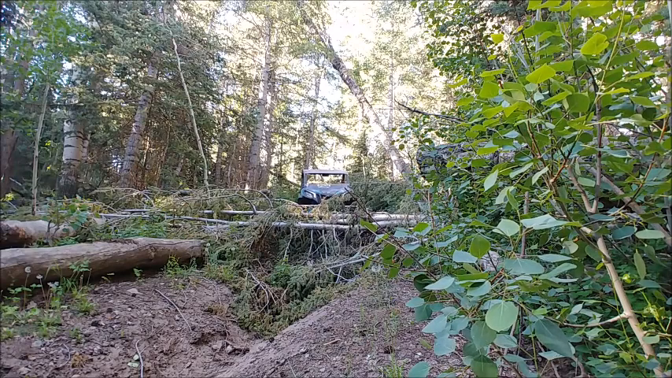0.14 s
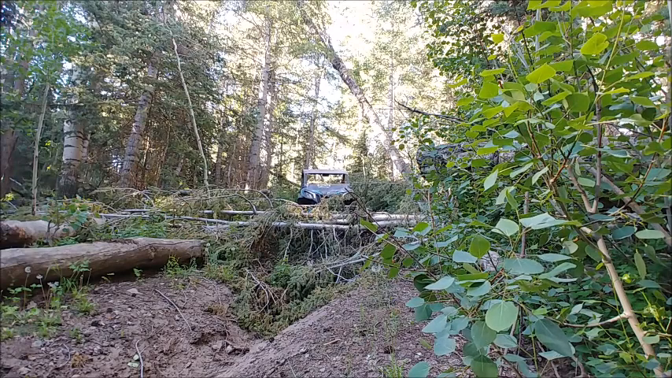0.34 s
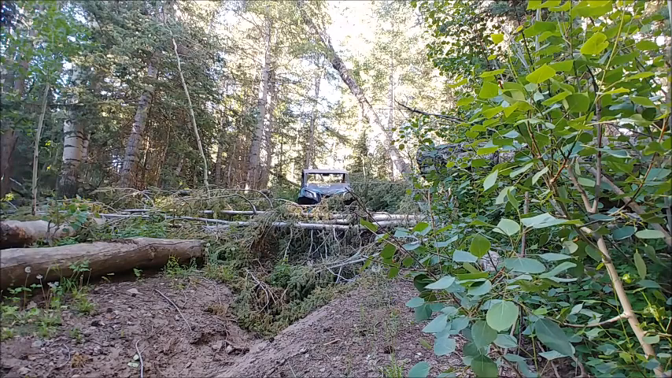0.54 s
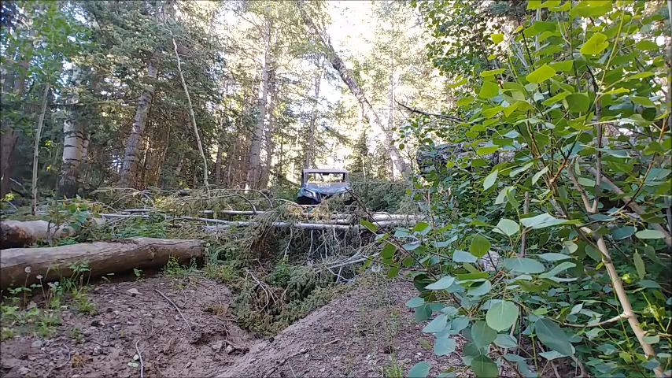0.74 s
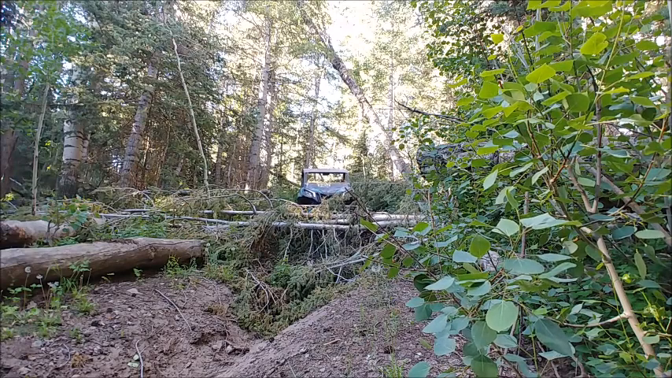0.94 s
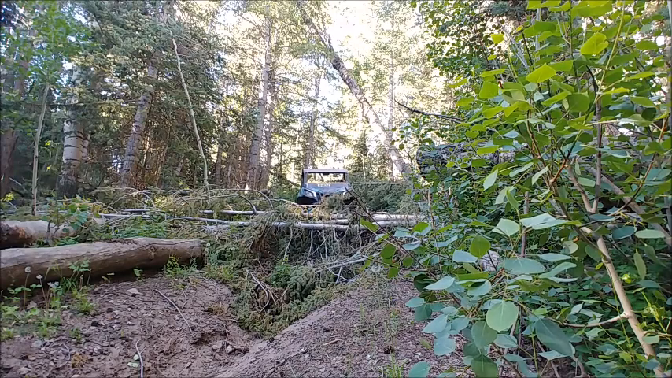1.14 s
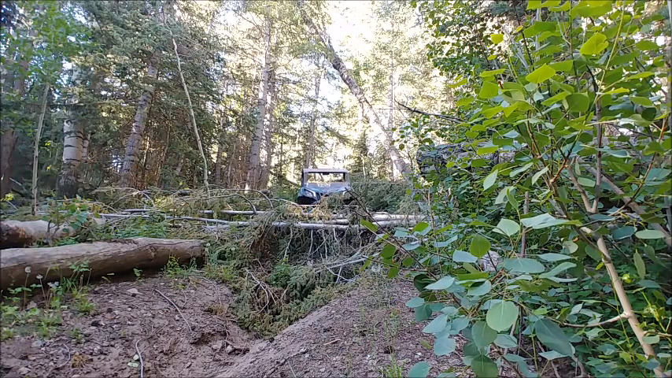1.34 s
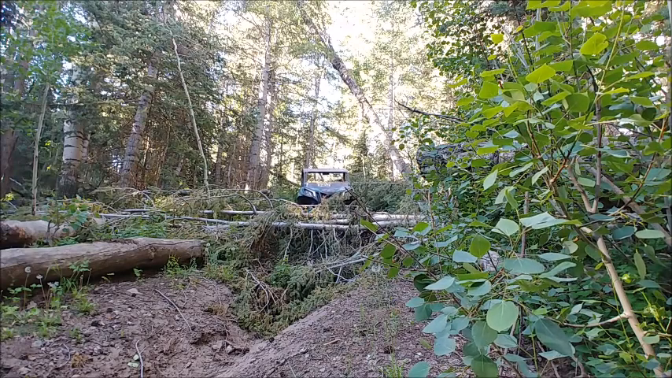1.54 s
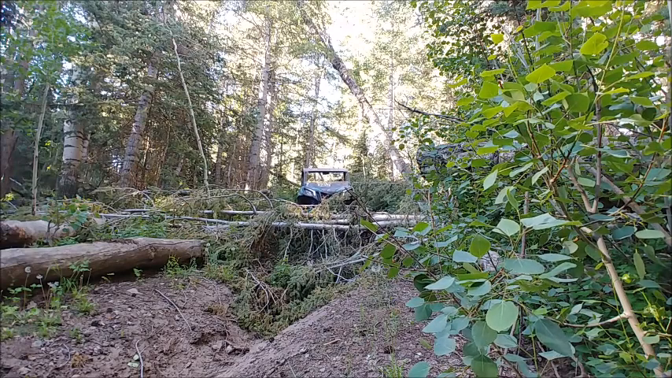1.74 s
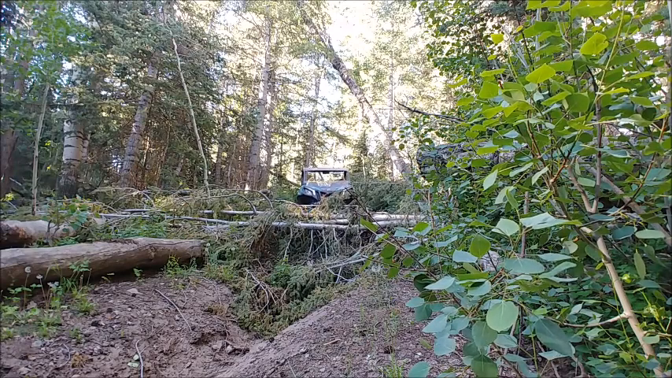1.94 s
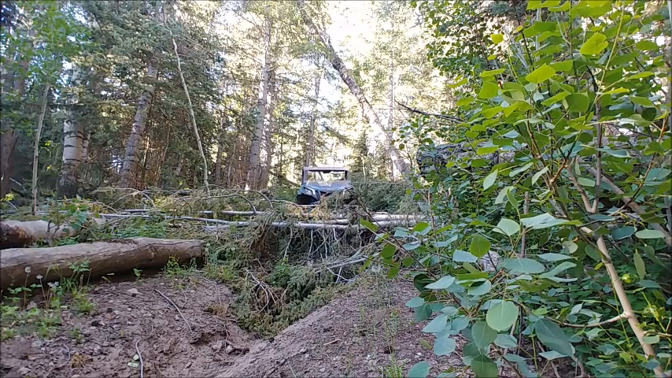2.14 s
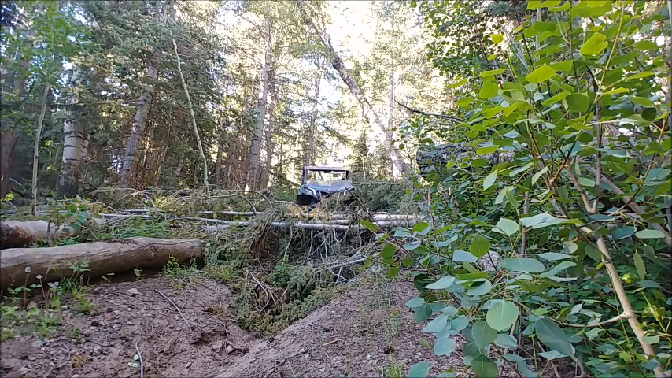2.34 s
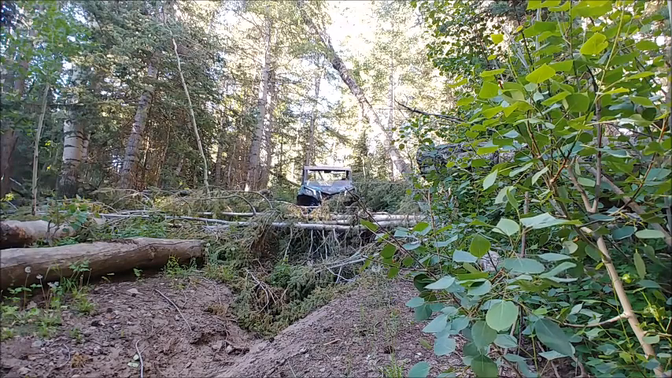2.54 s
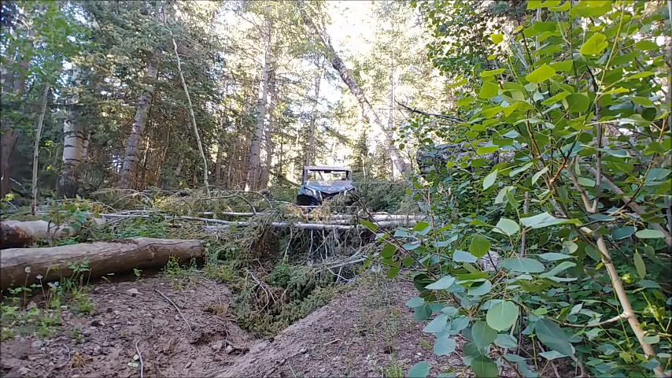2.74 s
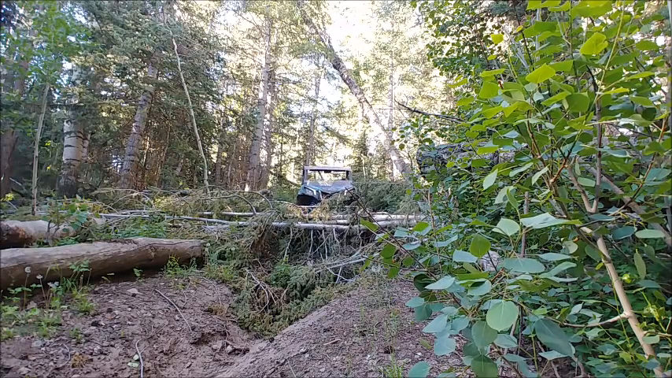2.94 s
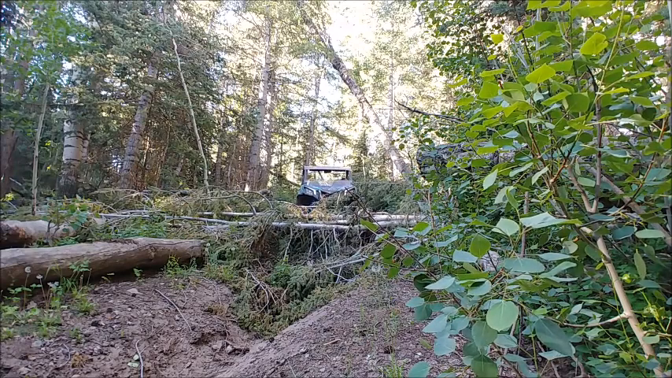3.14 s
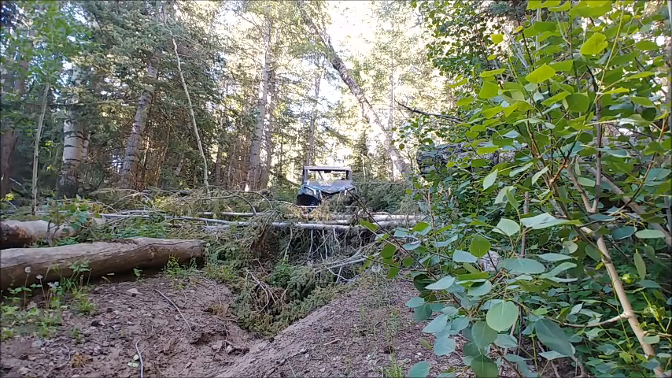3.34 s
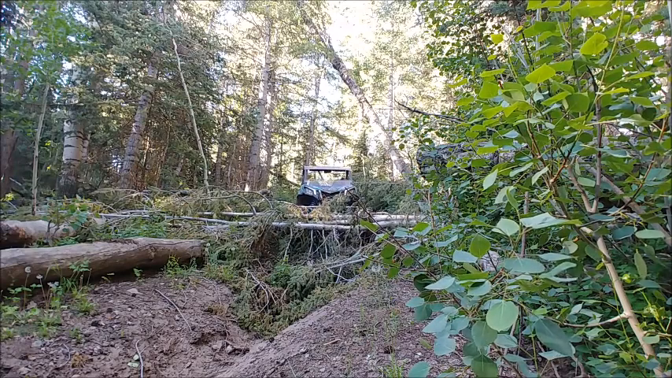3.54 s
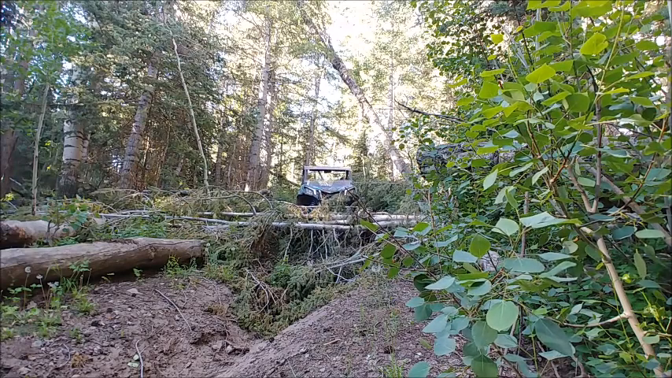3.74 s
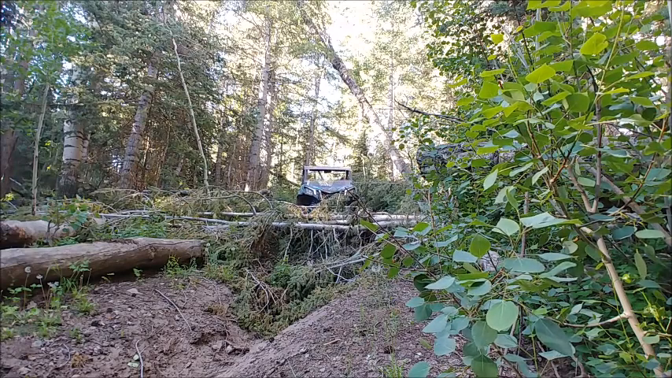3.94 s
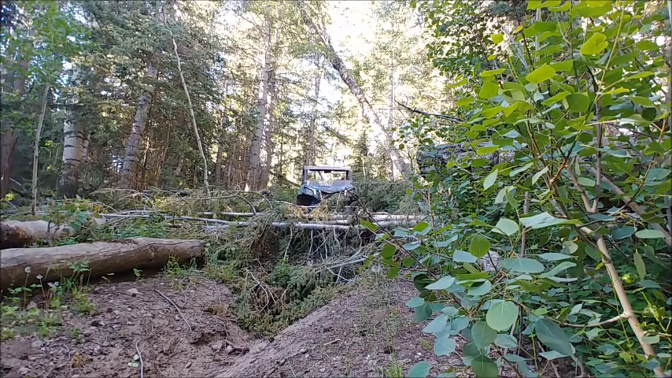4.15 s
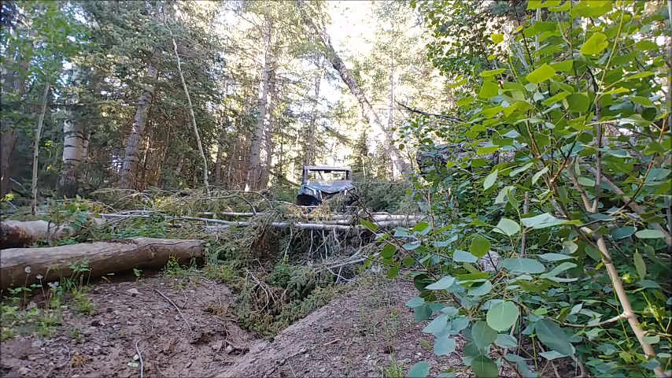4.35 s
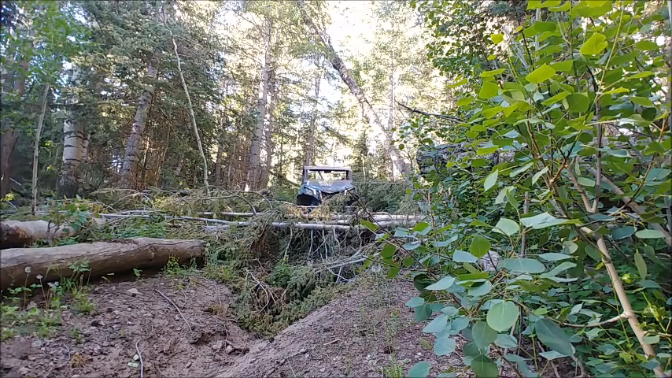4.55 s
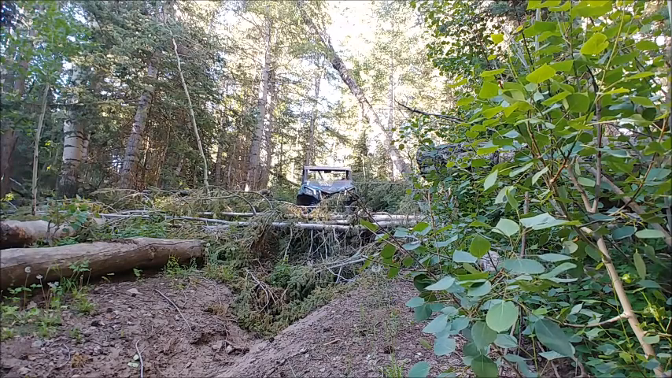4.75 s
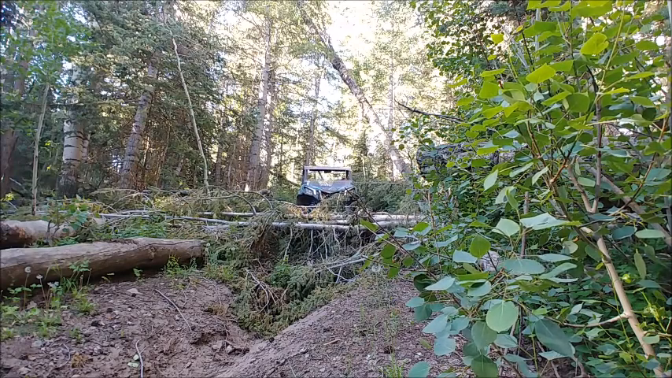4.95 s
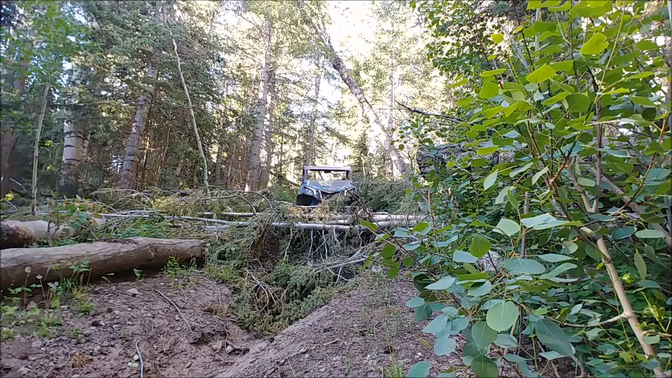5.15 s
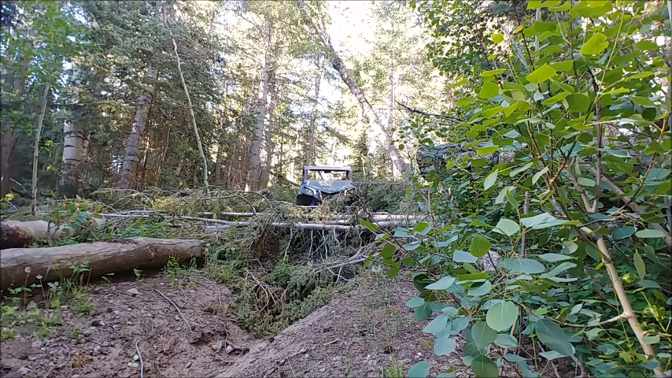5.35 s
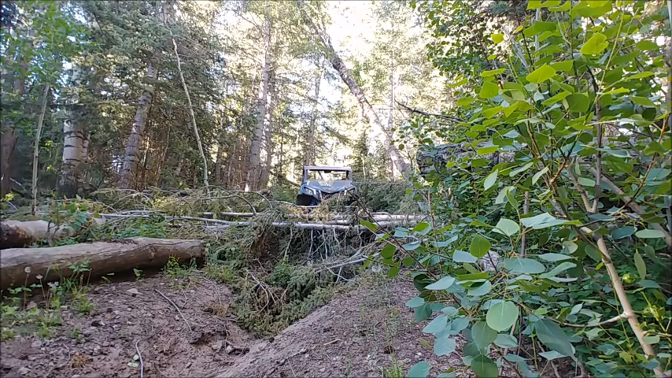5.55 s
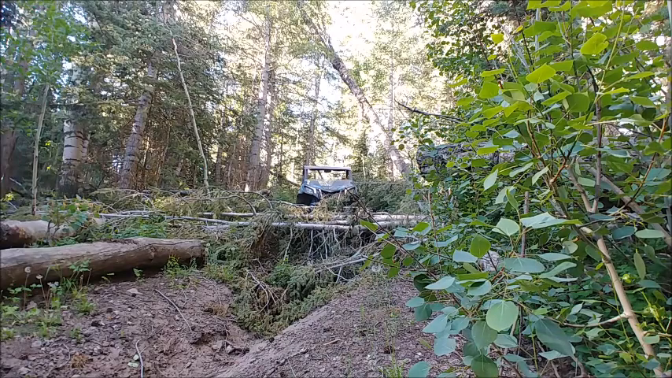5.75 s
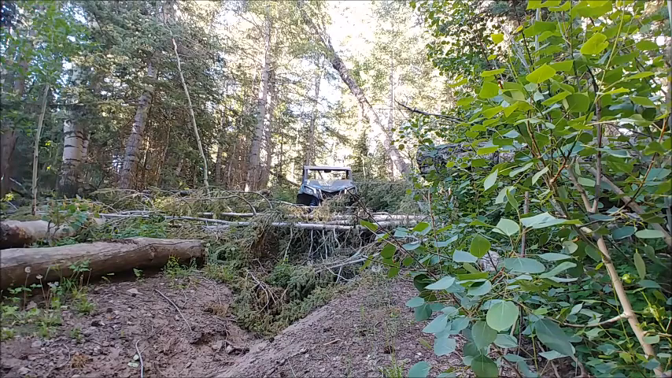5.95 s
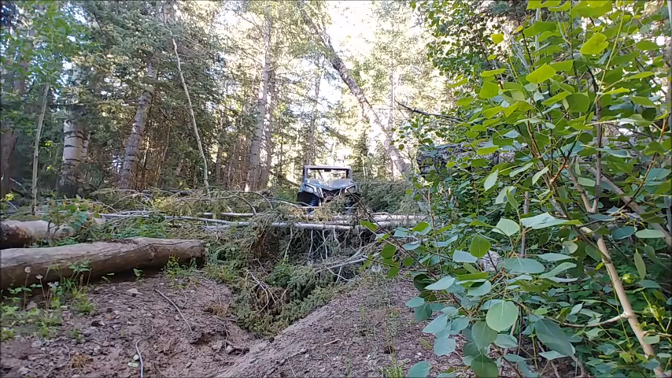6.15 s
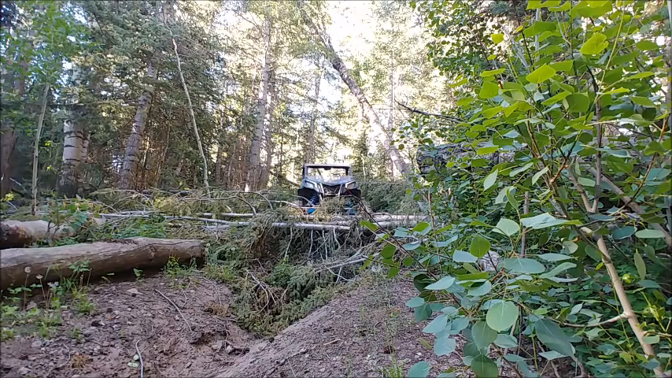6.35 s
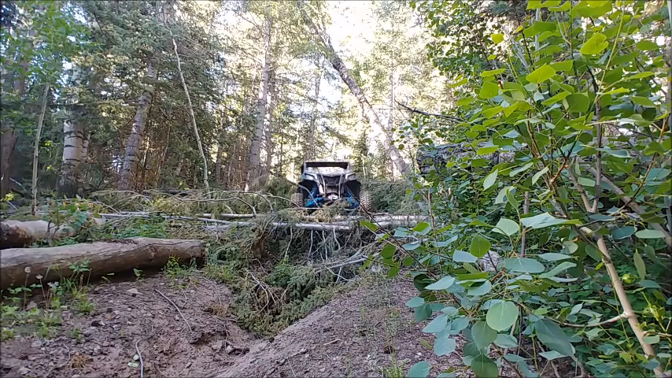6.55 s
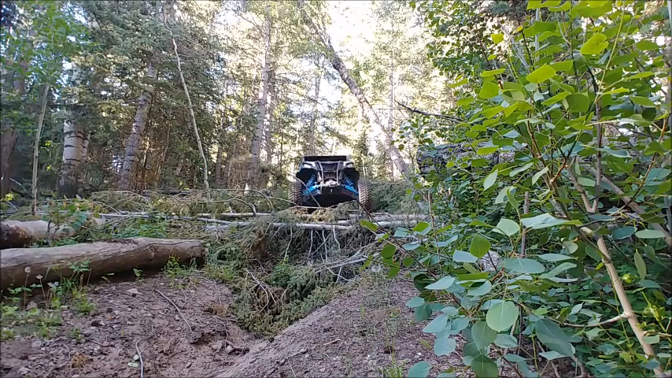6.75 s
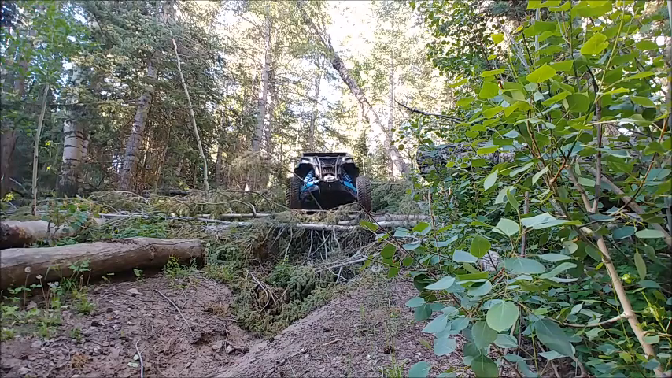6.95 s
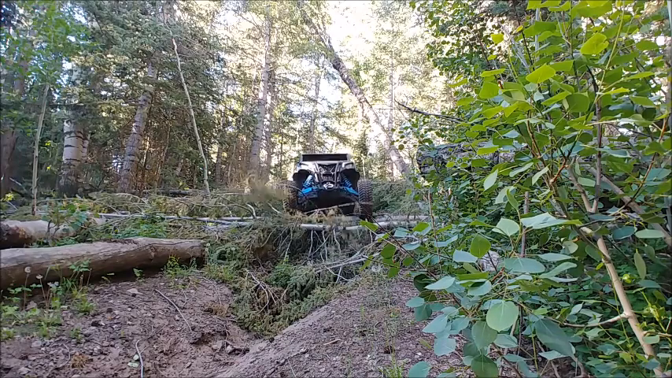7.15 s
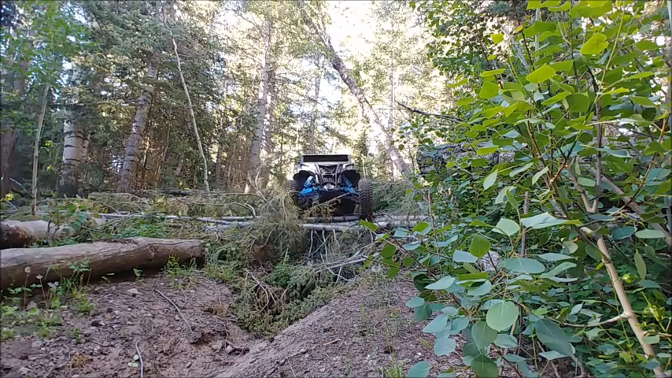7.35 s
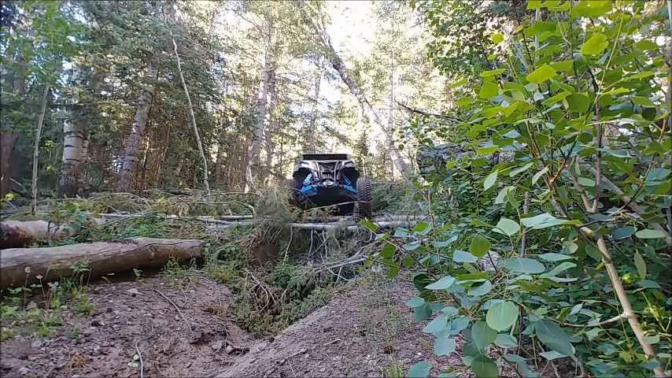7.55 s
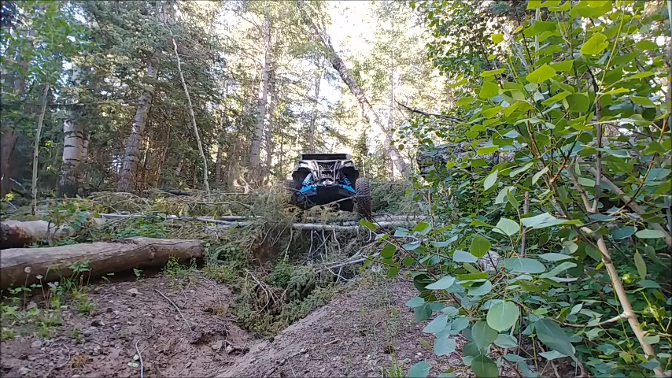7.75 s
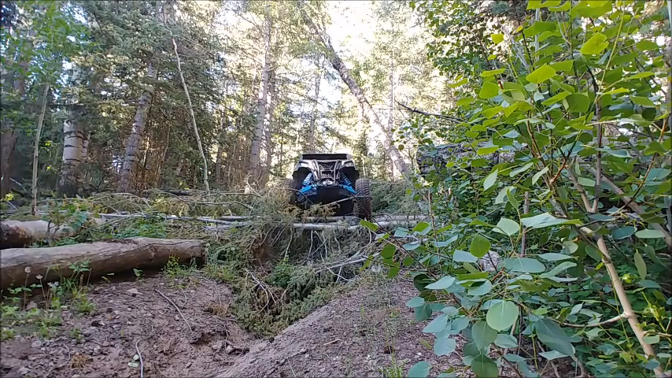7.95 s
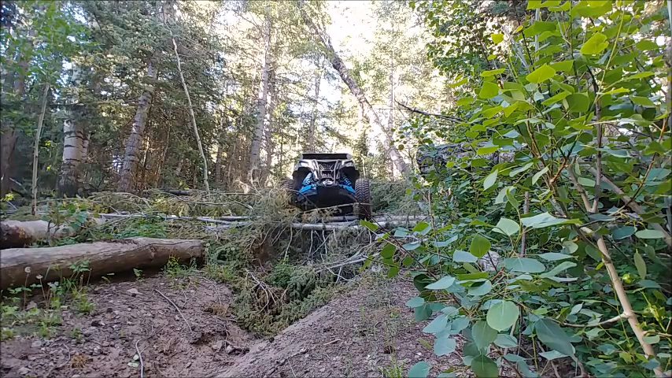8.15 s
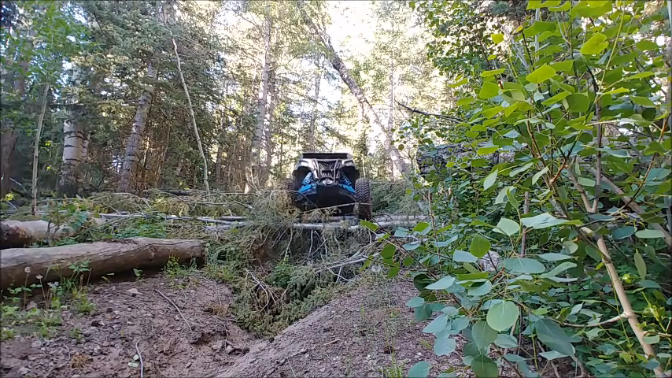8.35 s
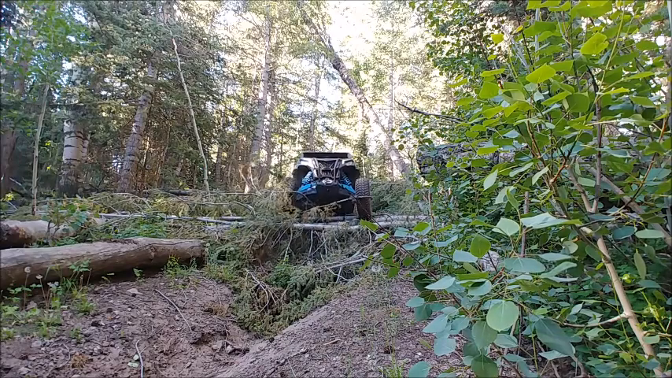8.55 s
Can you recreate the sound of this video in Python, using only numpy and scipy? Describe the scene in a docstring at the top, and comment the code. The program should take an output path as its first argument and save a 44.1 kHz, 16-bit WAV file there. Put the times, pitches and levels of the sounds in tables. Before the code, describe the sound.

In a wood, with faint leaf hiss all round, a twin-cylinder off-road vehicle runs some distance from a stereo microphone. From 0 s it throbs unevenly at low revs, with brush crackle, a sharp branch snap at 0.3 s, smaller snaps to 1 s, faint thin squeaks and a low hum sinking away by about 2.3 s. Revs creep up; a cluster of snaps and squeaks comes at 2-2.6 s. The engine climbs from 2.7 s to a growling, honking peak near 3.8 s, then drops quickly, stuttering with missed firings, to a slow lumpy idle at 4.6-5.3 s with soft low wood knocks. It revs again from 5.4 s, peaking at 6.8 s with a bright squeak. Branches snap from 6.2 s, and violent cracks and dense crunching erupt at 7-7.2 s as revs collapse. Rough idle follows, with small snaps at 7.8 s and the engine rising again towards 8.6 s.

```python
"""In a wood, a twin-cylinder off-road vehicle crawls over fallen trees some way from the microphones.
Exhaust pulses 270 and 450 degrees apart ring pipe and silencer, some missing after the throttle shuts.
Under them run noise and growl; the air box honks, and a thin hum sinks away. Branches snap as bursts
of noise, brush crackles as dense clicks, suspension bushes squeak as gliding tones.
Leaves hiss all round, and trunks scatter the sound towards two microphone ports."""
import sys
import numpy as np
from scipy import signal
from scipy.fft import rfft, irfft, next_fast_len
from scipy.io import wavfile
from scipy.ndimage import uniform_filter1d

SR = 44100
rng = np.random.default_rng(int(sys.argv[2]) if len(sys.argv) > 2 else 0)


def put_to_file(sound):
    """Save the sound as 16-bit audio at rate SR, in the file named by the first command-line argument."""
    columns = np.atleast_2d(sound).T  # one column per channel
    safe = np.clip(columns, -1, 1)
    whole_steps = np.round(safe * 32767)
    wavfile.write(sys.argv[1], SR, whole_steps.astype(np.int16))


N = 378815
TIME = np.arange(N) / SR
SIZE = next_fast_len(N + SR)  # FFT length, with a second to spare for tails
HZ = np.maximum(np.arange(SIZE // 2 + 1) * SR / SIZE, 1)
SECOND_FIRES = 270 / 720  # lag of the second cylinder, as a share of the four-stroke cycle

# crankshaft speed: (time [s], four-stroke cycles [1/s])
CRANK_SPEED = [(0.0, 18.22), (0.48, 19.22), (1.05, 19.64), (2.01, 22.39), (2.72, 23.46), (3.38, 30.81),
               (3.76, 33.26), (3.86, 31.54), (4.13, 17.66), (4.38, 15.78), (4.64, 11.76), (5.18, 11.08),
               (5.34, 12.43), (5.55, 19.5), (6.06, 23.72), (6.42, 25.27), (6.8, 32.34), (7.09, 17.13),
               (7.25, 13.76), (7.72, 11.76), (8.05, 11.82), (8.59, 15.87)]
# spectrum of the vehicle's noise: (frequency [Hz], relative density [dB per Hz])
ROAR_SPECTRUM = [(200, -30.5), (270, 1), (340, -13), (450, -5.5), (550, -7), (650, -15), (770, -12),
                 (1000, -10.5), (1450, -9.5), (1860, -25.5), (2180, -20.5), (4600, -31), (6200, -54.5),
                 (8200, -42), (10500, -48), (12500, -55), (16000, -87.5)]


def amp(db):
    """Gain of a dB value."""
    return 10 ** (np.asarray(db) / 20)


def rms_one(x):
    """Scales to rms 1."""
    return x / np.sqrt(np.mean(x ** 2))


def in_time(rows):
    """Columns of a curve table, one value per sample."""
    s, *columns = np.transpose(rows)
    return [np.interp(TIME, s, c) for c in columns]


def at_hz(points):
    """A (Hz, value) table on the FFT grid, interpolated over log frequency."""
    hz, value = np.transpose(points)
    return np.interp(np.log(HZ), np.log(hz), value)


def colour(x, spectrum):
    """Causal (minimum-phase) filter with the given dB spectrum."""
    cepstrum = irfft(np.log(amp(at_hz(spectrum))), SIZE)
    # folding the cepstrum onto positive time makes the phase minimal
    cepstrum[1:SIZE // 2] *= 2
    cepstrum[SIZE // 2 + 1:] = 0
    response = np.exp(rfft(cepstrum))
    return irfft(rfft(x, SIZE) * response, SIZE)[:N]


def split(x, hz):
    """Low and high part about a frequency."""
    low = signal.sosfilt(signal.butter(4, hz, fs=SR, output="sos"), x)
    high = signal.sosfilt(signal.butter(4, hz, "high", fs=SR, output="sos"), x)
    return low, high


def turned(x, radians):
    """Turns the phase of every partial by the same angle."""
    return np.real(signal.hilbert(x, SIZE)[:N] * np.exp(1j * radians))


def leaves(roar_db, db=-54):
    """Hiss from all round, unrelated at the two ports: steady foliage and dull roar from deep in the wood."""
    hiss = np.array([colour(v, ROAR_SPECTRUM) for v in rng.standard_normal((2, N))])
    low, high = split(rms_one(hiss), hz=6000)
    thrown_back = amp(roar_db - 16.5)
    return (amp(db) + thrown_back) * low + amp(db + 9.0) * high


def wood(x):
    """Colours a sound like breaking wood."""
    # (frequency [Hz], relative density [dB per Hz])
    wood_spectrum = [(180, -34.5), (300, 3), (714, 6), (1180, 4), (1670, 0), (1960, -8.5), (3350, -1),
                     (4240, -8), (4660, -1), (5380, -10.5), (6100, -27.5), (8760, -16), (13000, -30.5)]
    return colour(x, wood_spectrum)


def crackle_level():
    """Each push through brush swells the crackle and lets it die away, in dB; the strongest push counts."""
    # tyres push through brush: (time [s], crackle at its height [dB])
    push_list = [(0, -42), (0.129, -51.5), (.3, -53), (.8, -54), (1.92, -50), (2.268, -52), (2.47, -48.5),
                 (3.0, -56.5), (3.6, -56.5), (4.86, -56), (5.531, -55), (6.2, -53), (6.65, -43.5),
                 (6.85, -38.5), (7.031, -38), (7.58, -46), (7.7, -46), (8.499, -49.5)]
    rise_db_per_s, fall_db_per_s, rest_db = 155.5, 31, -70.5
    s, db = np.transpose(push_list)[:, :, None]
    slope = np.where(TIME < s, rise_db_per_s, fall_db_per_s)
    return np.maximum((db - slope * np.abs(TIME - s)).max(axis=0), rest_db)


def brush(crackle_db, clicks_per_s=2000):
    """Twigs and leaves under the tyres: dense small clicks of uneven size."""
    size_db = 2.2 * np.minimum(rng.exponential(1, N), 5)
    sizes = amp(size_db) * rng.standard_normal(N)
    clicks = sizes * (rng.random(N) < clicks_per_s / SR)
    return amp(crackle_db) * rms_one(wood(clicks))


def snaps():
    """A branch cracks sharply, then its fibres tear as dying noise; a low knock has a level of its own."""
    # branch snaps, levels ahead of the wood colour and common gain:
    # (time [s], crack level [dB], low knock against it [dB], pitch at which the branch rings [Hz])
    snap_list = [(0.121, -46, -18, 5000), (0.132, -42.5, -17, 3100), (0.259, -35, -4.5, 2100),
                 (0.294, -22.5, -14.5, 4400), (0.439, -37.5, -14.5, 1000), (0.788, -36.5, -15, 3240),
                 (0.847, -39.5, -5.5, 3250), (0.909, -37.5, -21.5, 3270), (1.036, -38.5, -3.5, 3280),
                 (1.922, -36, -19.5, 3500), (2.0497, -36.5, -2, 3130), (2.266, -25.5, -29, 3540),
                 (2.4593, -26.5, -12.5, 3160), (2.5063, -29.5, -9, 4600), (2.5683, -31.5, -15, 3420),
                 (2.5974, -42.5, -8, 4700), (4.0785, -49, 13.5, 1500), (4.5141, -46.5, 9.5, 1350),
                 (4.589, -44.5, 5, 806), (4.8313, -49, 9, 1020), (4.8477, -42, 6, 1280),
                 (5.524, -47, 8, 1090), (6.182, -33.5, -21, 3330), (6.208, -38, -18.5, 4600),
                 (6.24, -39, -13, 3340), (6.282, -37, -10.5, 4860), (6.314, -38.5, -2.5, 2600),
                 (6.427, -39, -11, 4630), (6.4642, -31, -10.5, 3050), (6.6296, -23.5, -8, 4820),
                 (7.001, -19.5, -18.5, 4770), (7.012, -12, -10.5, 3610), (7.014, -25.5, 3, 1210),
                 (7.0312, -22, -9, 3300), (7.0699, -29, -17, 3020), (7.152, -15.5, 1, 1030),
                 (7.177, -38, -13.5, 3300), (7.242, -35, 1.5, 1010), (7.266, -44.5, 12, 490),
                 (7.7743, -41.5, -1.5, 3300), (7.795, -37, -12, 3400)]
    # thick wood knocks low and dies slowly: (low knock against crack [dB], 60 dB decay time [s])
    decay_by_knock = [(-20.5, 0.022), (-11.5, 0.026), (2, 0.032), (6.5, 0.13)]
    ring_q, ring_weight = 10, .9
    low_band, high_band = np.zeros((2, N))
    t = np.arange(SR // 5) / SR
    fibre_noise = rng.standard_normal((len(snap_list), len(t)))
    for (s, db, knock_db, hz), fibres in zip(snap_list, fibre_noise):
        i = round(s * SR)
        t60 = np.interp(knock_db, *np.transpose(decay_by_knock))
        onset = 1 - np.exp(-t / 0.00046)
        crack = amp(-60 * t / 0.0056)
        tearing = amp(-6.0 - 60 * t / max(t60, .01))
        burst = fibres * onset * (crack + tearing)
        ringing = signal.lfilter(*signal.iirpeak(hz, ring_q, fs=SR), burst)
        snap = (0.77 * burst + ring_weight * ringing)[:N - i]
        low_band[i:i + len(t)] += amp(db + knock_db) * snap
        high_band[i:i + len(t)] += amp(db) * snap
    low = split(wood(low_band), hz=2080)[0]
    high = split(wood(high_band), hz=1730)[1]
    return amp(12.0) * (low * amp(-0.5) + high)


def squeaks(waver_hz=18, rough_db=3.0):
    """Rubbing suspension bushes sing as slightly rough gliding tones; waver_hz is scaled to a 7 kHz tone."""
    # levels ahead of a common 4 dB: (time [s], length [s], start pitch [Hz], end pitch [Hz], level [dB])
    squeak_list = [(.05, .13, 7300, 7380, -52), (.2, .13, 7650, 7670, -52), (1.07, .14, 7650, 7400, -49),
                   (1.58, .1, 12000, 12000, -64), (2.0, .12, 8900, 8870, -59),
                   (2.08, .07, 10150, 10150, -62), (2.32, .07, 7370, 7350, -56),
                   (2.35, .3, 6840, 6830, -50), (2.2, .06, 1400, 1400, -54), (2.24, .09, 4880, 4900, -57),
                   (2.355, .07, 2150, 2150, -55), (2.4, .16, 2150, 2150, -54), (2.37, .1, 4300, 4280, -55),
                   (6.53, .08, 9750, 9900, -61), (6.74, .06, 7350, 7250, -50), (6.79, .1, 7030, 7200, -32),
                   (6.81, .06, 7450, 7550, -43), (6.8, .07, 14150, 14300, -68),
                   (6.87, .14, 7200, 7700, -52), (6.87, .07, 8250, 8250, -57)]
    out = np.zeros(N)
    slow = signal.butter(2, 90, fs=SR, output="sos")
    for s, length, hz0, hz1, db in squeak_list:
        i, u = round(s * SR), np.linspace(0, 1, int(length * SR))
        waver, rough = 16 * signal.sosfilt(slow, rng.standard_normal((2, SR // 2)))[:, :len(u)]
        pitch = hz0 + (hz1 - hz0) * u + waver_hz * hz0 / 7000 * waver
        phase = 2 * np.pi * np.cumsum(pitch) / SR
        swell = np.sin(np.pi * u ** 0.73) ** 2
        out[i:i + len(u)] += amp(db + 4.0 + rough_db * rough) * swell * np.sin(phase)
    return out


def hum(octave_db=-4, octave_fade_db_per_s=12):
    """A thin low tone that sinks and fades, its octave sooner."""
    # (time [s], pitch [Hz], level [dB])
    hum_curve = [(0, 285, -44), (1, 223, -40), (1.9, 192, -51), (2.3, 169, -78.5)]
    hz, db = in_time(hum_curve)
    phase = 2 * np.pi * np.cumsum(hz) / SR
    octave = amp(octave_db - octave_fade_db_per_s * TIME) * np.sin(2 * phase)
    return amp(db) * (np.sin(phase) + octave)


def intake(roar_db, lead_s=0.005693, uneven_db=3.05):
    """As each inlet valve shuts, a short knock per cylinder and cycle rings the air box resonances."""
    # air box: (frequency [Hz], knock gain against the roar [dB], 60 dB decay time [s],
    # place in the cycle [0-1], other cylinder [dB])
    air_box = [(238.2, 18.5, 0.08, .57, -5.5), (414, 10.5, 0.039, .76, -16), (559.5, 5, .05, .95, -6.5),
               (763, 5, 0.033, 0.8, 0), (988, -0.5, .05, .8, -1)]
    roar_share = 0.4  # how much of the roar's swing in dB the honk follows
    speed, out = in_time(CRANK_SPEED)[0], 0
    cycles = np.cumsum(speed) / SR + lead_s * speed + 1
    uneven = uneven_db * rng.standard_normal((len(air_box), 2, 400))
    for (hz, db, t60, place, other_db), chance in zip(air_box, uneven):
        knocks = np.zeros(N)
        for k in range(2):
            turn = np.floor(cycles - place + k * SECOND_FIRES).astype(int)
            knocks[1:] += np.diff(turn) * amp(k * other_db + chance[k, turn[1:]])
        # a two-pole resonator: pole radius r, angle w
        r, w = amp(-60 / (t60 * SR)), 2 * np.pi * hz / SR
        poles = [1, -2 * r * np.cos(w), r * r]
        out = out + amp(db) * signal.lfilter([0, np.sin(w)], poles, knocks + 1e-18)
    mean_db = roar_db.mean()
    return amp(mean_db + roar_share * (roar_db - mean_db)) * out


def blowdown(second_db, second_turn, uneven_db, start=0.98, lead_s=0.00548, width=0.1, suck=(.5, .6),
             suck_lead=0.0521):
    """Exhaust valve pulses over a fixed crank angle, each led by a pressure dip and heard lead_s ahead of the
    crank count."""
    # weak or missed firings after the throttle shuts: (time [s], level change [dB])
    miss_list = [(4.055, -17), (4.47, -25), (4.572, -5), (4.622, -26), (4.655, -2), (4.739, -6),
                 (4.792, -9), (4.999, -7.5), (6.899, -31.5), (6.923, -16.5), (6.938, -13.5), (7.007, -14),
                 (7.025, -16.5), (7.058, -23), (7.115, -6), (7.245, -4), (7.272, -9.5), (7.32, -23.5),
                 (7.472, -41.5), (7.633, -20.5)]
    tailpipe_turn = -.6  # radians: the open end deepens the dip ahead of every pulse
    speed = in_time(CRANK_SPEED)[0]
    cycles = start + suck_lead + np.cumsum(speed) / SR + lead_s * speed
    firing = [cycles - lag for lag in (0, SECOND_FIRES)]
    out, pumped = np.zeros((2, N))
    chance, missed = rng.standard_normal((400, 2)), np.zeros((400, 2))
    # each miss goes to the cylinder firing nearest to it
    for s, loss_db in miss_list:
        near = [f[int(s * SR)] - .12 for f in firing]
        cylinder = int(np.argmin([abs(f - round(f)) for f in near]))
        missed[round(near[cylinder]), cylinder] += loss_db
    for cylinder, f in enumerate(firing):
        dip = (f % 1) / width
        puff = np.maximum(f % 1 - suck_lead, 0) / width
        shape = puff * np.exp(1 - puff) - suck[cylinder] * dip * np.exp(1 - dip)
        turn = np.floor(f).astype(int)
        angle = tailpipe_turn + cylinder * second_turn
        db = uneven_db * chance[turn, cylinder] + missed[turn, cylinder] + cylinder * second_db
        out += turned(amp(db) * shape, angle)
        pumped += turned(shape, angle)
    return out * speed / 20, pumped


def engine(pulse_db, roar_db, *firing):
    """Pulses ring the exhaust and shake the panels; gas and mechanical noise swell a little after each firing."""
    # exhaust pipe and silencer, brighter as the gas gets hotter:
    # (frequency [Hz], relative gain at idle [dB], at half revs [dB], at high revs [dB])
    exhaust_gain = np.array([(19.7, -46, -30, -35), (49, -16, -26.5, -7), (84.2, 1.5, 3, -17.5),
                             (92.7, -10, 0.5, -16), (125.5, 10.5, 5.5, 4), (150.3, -4, 9.5, 7),
                             (172.8, -1.5, -6, 3), (213, 0.5, -1, -12), (233, 0, -6.5, -22),
                             (302.8, -12, -4.5, -20), (314, -43.5, -42, -59.5), (470, -42, -42, -31),
                             (940, -59.5, -57.5, -54)])
    # crank speeds of those three gain columns [cycles/s]
    column_speeds = [12, 20, 31]
    pulses, pumped = blowdown(*firing)
    speed = in_time(CRANK_SPEED)[0]

    exhaust = 0
    for k, share in enumerate(np.eye(3)):
        weight = np.interp(speed, column_speeds, share)
        exhaust = exhaust + colour(pulses * amp(pulse_db) * weight, exhaust_gain[:, [0, k + 1]])
    # air pumped by the pistons keeps the silencer ringing, fired or not
    silencer = signal.lfilter(*signal.iirpeak(118, 5.0, fs=SR), pumped)

    swell = signal.lfilter([.004], [1, -.996], np.abs(pulses))
    gas = rng.standard_normal(N) * (1 + 0.25 * swell / swell.mean())
    # the noise is thinner low down, where the growl takes over
    thinned = gas - .6 * signal.lfilter([.08], [1, -.92], gas)
    roar = colour(thinned, ROAR_SPECTRUM)

    # the sharp front of each pulse rattles the same panels, so the growl repeats cycle by cycle
    panels = rng.standard_normal(SR // 10) * amp(-60 * TIME[:SR // 10] / .06)
    # many modes: they spread the front in time, evenly in pitch
    smear = np.exp(1j * np.angle(rfft(panels, SIZE)))
    sharp = np.diff(pulses, 2, prepend=[0, 0])
    fronts = irfft(rfft(sharp, SIZE) * smear, SIZE)[:N]
    growl = colour(split(fronts, hz=680)[0], ROAR_SPECTRUM)

    mix = rms_one(roar) + .8 * rms_one(growl)
    dulled = signal.lfilter([.6], [1, -.4], mix)  # distance dulls the top
    return rms_one(exhaust) * amp(-17.5) + rms_one(silencer) * amp(-29.5) + amp(roar_db + 2.5) * dulled


def ports(x, around, t60=0.32):
    """Direct sound plus separate trunk scatter for each microphone port; ports differ in level and phase."""
    # (frequency [Hz], left over right [dB])
    level_gap = [(25, -10), (60, -6), (125, -1), (250, 0.3), (700, -1), (1290, 2), (2380, 4.5), (4400, 18),
                 (8120, 7.5), (15000, 0)]
    # (frequency [Hz], phase by which the left port leads [rad])
    phase_lead = [(40, 1.1), (125, .93), (260, .7), (520, .5), (1200, .9), (2000, 1.5), (3270, 1.4),
                  (4650, 2.4), (7000, 1.6), (12000, 1.1)]
    # (frequency [Hz], share of power not scattered by trunks [0-1])
    direct_share = [(200, .999), (500, .93), (2000, .86), (8000, .75)]
    t = np.arange(SR) / SR
    scatter = rng.standard_normal((2, SR)) * amp(-60 * t / t60)
    scatter /= np.sqrt(np.sum(scatter ** 2, axis=1, keepdims=True))
    direct = np.clip(at_hz(direct_share), 0, 1)
    path = np.sqrt(direct) + np.sqrt(1 - direct) * rfft(scatter, SIZE)
    side = np.array([[.5], [-.5]])  # left, right
    port = amp(side * at_hz(level_gap)) * np.exp(1j * side * at_hz(phase_lead))
    return irfft(port * (rfft(x, SIZE) * path + rfft(around, SIZE)), SIZE)[:, :N]


def scene():
    """Vehicle, snaps and brush share one path to the microphones; the leaves' hiss comes from all round."""
    # what follows the revs: (crank speed [cycles/s], relative exhaust pulse [dB],
    # second cylinder against first [dB], roar ahead of later gains [dB],
    # turn of the second pulse by its longer header [rad], unevenness of the firings [dB])
    by_revs = [(12, -12.5, -2.5, -55, -0.76, 2.5), (18.03, -19, -1.5, -50, -1.5, 2.2),
               (19.4, -19.5, -5.5, -47.5, .3, .4), (21.1, -19.5, -2, -49, .1, 0.57),
               (34.7, -17, -1, -40.5, -0.33, 0.4)]
    # the roar dips and swells as the vehicle moves, ending stronger as it comes nearer:
    # (time [s], change of roar [dB])
    nearness = [(0, 1.5), (.9, -3.5), (3.2, 1), (4.6, -5.5), (6.1, -1), (6.8, 4), (7.4, 2.5), (8.1, 1),
                (8.59, 5.5)]
    overrun_db = 0.06  # pulses weaken by this per cycle/s lost each second
    speed = in_time(CRANK_SPEED)[0]
    revs, *columns = np.transpose(by_revs)
    pulse_db, second_db, roar_db, second_turn, uneven_db = (np.interp(speed, revs, c) for c in columns)
    slowing = uniform_filter1d(np.minimum(np.gradient(speed) * SR, 0), size=SR // 10)
    roar_db = roar_db + in_time(nearness)[0]
    motor = engine(pulse_db + overrun_db * slowing, roar_db, second_db, second_turn, uneven_db)
    vehicle = motor + intake(roar_db) + squeaks() + hum()
    return ports(vehicle + snaps() + brush(crackle_level()), leaves(roar_db))


def record(dry):
    """Full scale clips; the top is cut at 16 kHz."""
    top_cut = signal.cheby2(12, 70, 16000, fs=SR, output="sos")
    return signal.sosfilt(top_cut, np.clip(dry, -1, 1))


dry = scene()
out = record(dry)
put_to_file(out)
```